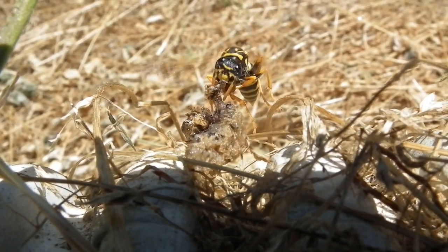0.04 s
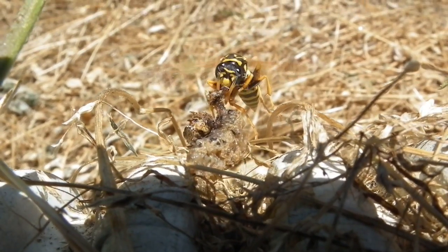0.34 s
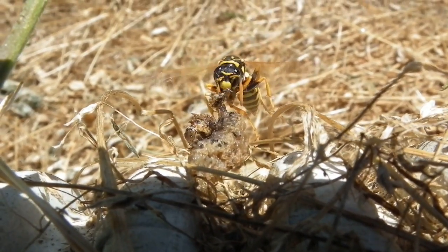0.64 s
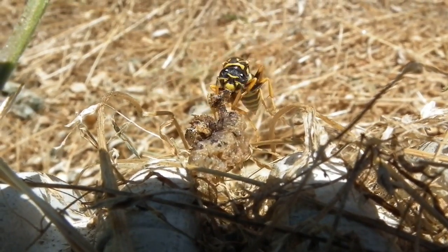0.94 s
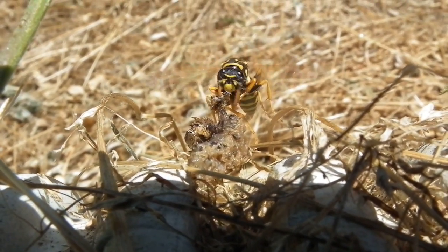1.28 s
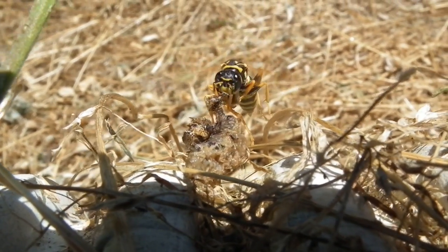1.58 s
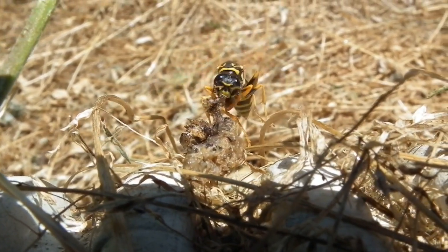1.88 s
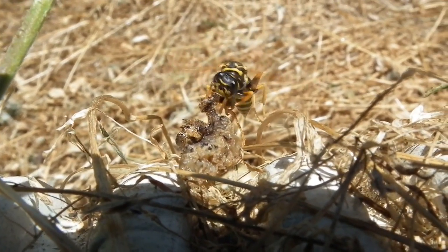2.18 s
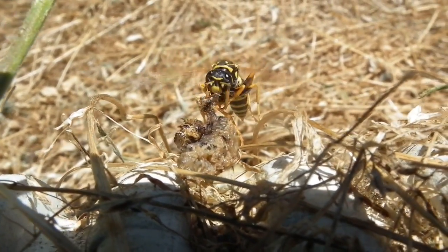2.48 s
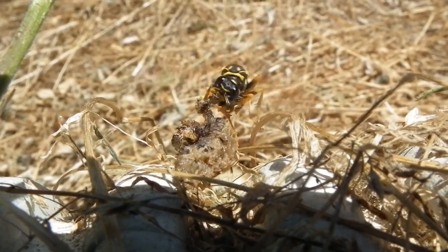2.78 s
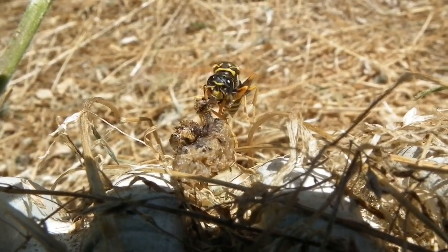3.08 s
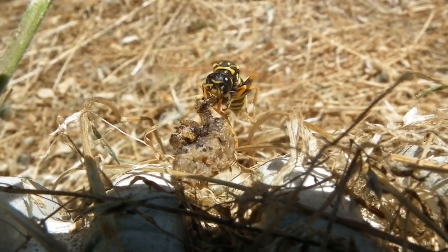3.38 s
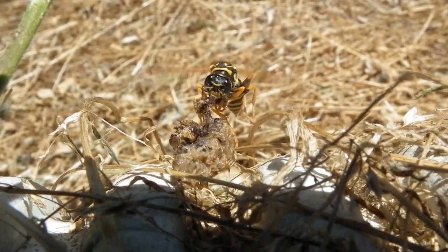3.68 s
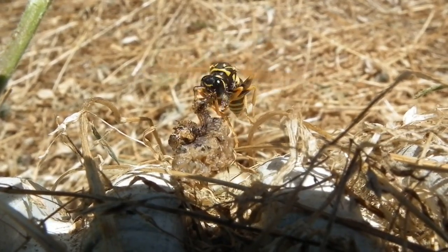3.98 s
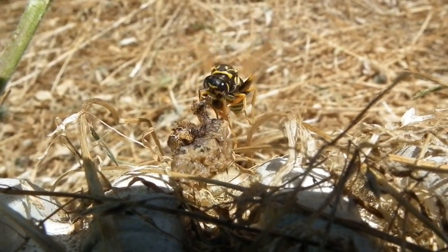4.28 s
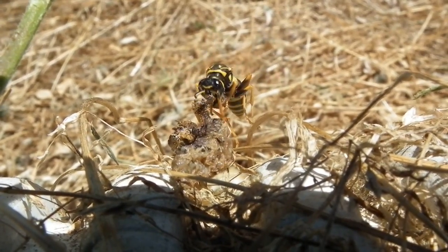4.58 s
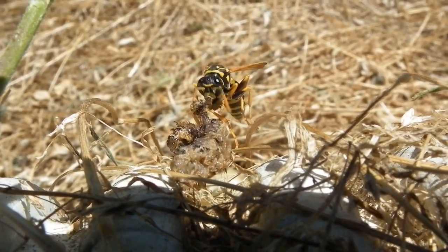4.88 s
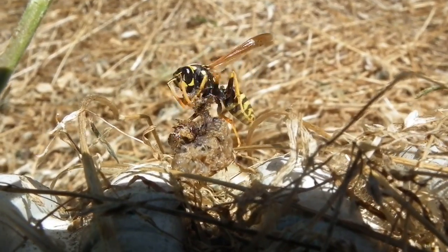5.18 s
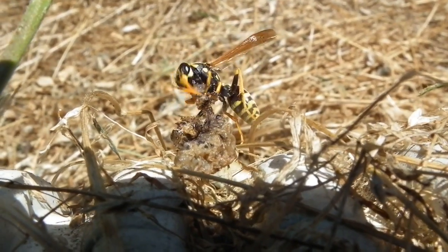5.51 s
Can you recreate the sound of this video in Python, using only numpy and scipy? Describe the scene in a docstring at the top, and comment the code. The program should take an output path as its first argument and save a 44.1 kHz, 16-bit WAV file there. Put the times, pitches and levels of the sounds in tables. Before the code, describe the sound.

A quiet outdoor bed of far rumble, soft air hiss and a faint low drone runs throughout, with a very high, barely audible insect pulsing about four times a second. Close to the microphone, dry straw ticks lightly and irregularly under a feeding wasp. It rustles softly around 1.7 and 2.5 seconds, with the clearest pair of ticks at about 2.4 seconds. A faint distant hum swells near 2.5 seconds and slowly fades. Far birds give thin, short whistles and chirps from about 0.5 to 2.2 seconds, then again from 3.4 seconds onward, coming more often after 4 seconds. At about 5.4 seconds a camera button is pressed and released: two sharp clicks in very quick succession, much louder than everything else, with a thin, brief spring ping.

```python
"""Hot day in dry grass.

A bed of far rumble, soft air hiss and a faint hum, with distant birds and a thin, high insect.
Close by, the straw rustles and ticks faintly as stalks slip under a feeding wasp.
Near the end a camera button is pressed and let go: two sharp clicks ring the body and the spring."""
import sys
import numpy as np
from scipy import signal
from scipy.io import wavfile

SR = 44100
rng = np.random.default_rng(int(sys.argv[2]) if len(sys.argv) > 2 else 0)


def unload_wav(signal):
    """Save mono or channel-first audio to the path in sys.argv[1] as 16-bit WAV at rate SR, clipped to [-1, 1]."""
    wavfile.write(
        sys.argv[1],
        SR,
        np.round(np.clip(np.atleast_2d(signal).T, -1, 1) * 32767).astype(np.int16),
    )


N = 249165
T = np.arange(N) / SR


def from_db(db):
    """Decibels to gain."""
    return 10 ** (np.asarray(db) / 20)


def rms_one(x):
    """Scale to rms 1."""
    return x / np.sqrt(np.mean(x ** 2) + 1e-20)


def unit_click(x):
    """Scale a stereo click to the energy of one millisecond at rms 1."""
    return x / np.sqrt(np.sum(x ** 2) / 2 / (SR / 1000))


def at_hz(curve, hz):
    """Read a curve on a log-frequency axis."""
    freqs, values = np.array(curve).T
    return np.interp(np.log(hz), np.log(freqs), values)


def panned(pan_db):
    """Left and right gains; positive pans left."""
    return from_db(np.array([[.5], [-.5]]) * pan_db)


def stereo(mid, side, correlation):
    """Spread two noises to left and right; lower correlation is wider."""
    return np.sqrt(1 + correlation) * mid + np.sqrt(1 - correlation) * side * [[1], [-1]]


def add(out, start_s, sound):
    """Mix a sound in at its cue."""
    i = int(start_s * SR)
    out[:, i:i + sound.shape[-1]] += sound[..., :N - i]


def drift(rate_hz):
    """Smooth random modulation at rms 1."""
    hop, warm_up = 40, 2000
    pole = np.exp(-2 * np.pi * rate_hz * hop / SR)
    white = rng.standard_normal(N // hop + warm_up + 2)
    slow = signal.lfilter([1], [1, -2 * pole, pole ** 2], white)[warm_up:]
    return np.interp(np.arange(N) / hop, np.arange(len(slow)), rms_one(slow))


def band(x, low, high):
    """Band-pass between two edges in Hz."""
    return signal.sosfilt(signal.butter(2, [low, high], "band", fs=SR, output="sos"), x)


def bands(low, high, count):
    """Rows of (lower edge, centre, upper edge), evenly spread in pitch."""
    edges = np.geomspace(low, high, count + 1)
    return zip(edges, np.sqrt(edges[:-1] * edges[1:]), edges[1:])


def blurred_tone(hz, width_hz):
    """A steady or gliding pitch blurred into a narrow band of noise."""
    phase = 2 * np.pi * np.cumsum(np.broadcast_to(hz, N)) / SR
    return rms_one(drift(width_hz) * np.cos(phase) + drift(width_hz) * np.sin(phase))


def glide(hz):
    """A sine that follows a pitch curve."""
    return np.sin(2 * np.pi * np.cumsum(hz) / SR)


def burst(low, high, t60, correlation):
    """Crowded modes of one band, struck at once and dying together; unit energy per Hz."""
    t = T[:SR // 8]
    mid, side = rng.standard_normal((2, len(t))) * from_db(-60 * t / t60)
    ring = band(stereo(mid, side, correlation), low, high)
    return ring * np.sqrt((high - low) / np.sum(ring ** 2, axis=1, keepdims=True))


# Tone of the air bed: (frequency [Hz], relative density [dB])
AIR_SPECTRUM = [(25, -20), (36, -3.5), (48, -9), (70, -0.5), (115, -0.5), (320, -4), (540, -8.5),
                (700, -8.5), (1400, -13.5), (2700, -21), (4000, -19.5), (6800, -24.5), (8500, -31),
                (15000, -35.5)]
# Its stereo image: (frequency [Hz], left-right correlation [0-1])
AIR_CORRELATION = [(60, 0.87), (140, 0.81), (350, 0.52), (700, 0.44), (1500, 0.093), (4000, 0.047),
                   (12000, 0.18)]
# Its balance: (frequency [Hz], pan [dB])
AIR_PAN = [(60, 1.5), (180, 1), (700, 0), (3000, 0.1), (12000, 1.5)]
def air(level_db=-46, flutter_db=0.6):
    """Far rumble, nearly mono, thinning into a wide, diffuse hiss."""
    out, white = 0, rng.standard_normal((2, 2, N))
    for k, (low, hz, high) in enumerate(bands(24, 16500, count=26)):
        mid, side = band(white[k % 2], low, high)
        gain = from_db(at_hz(AIR_SPECTRUM, hz) + flutter_db * drift(2.9)) * panned(at_hz(AIR_PAN, hz))
        out = out + gain * stereo(mid, side, at_hz(AIR_CORRELATION, hz))
    return from_db(level_db) * rms_one(out)


# Drone partials: (pitch [Hz], width [Hz], level [dB])
DRONE_PARTIALS = [(69, 3.9, -60.5), (159.7, 7.7, -58), (325.2, 5.4, -62.5), (425, 24, -63), (691, 45, -66)]
def drone():
    """A far, low drone of blurred tones."""
    return sum(from_db(db) * blurred_tone(hz, width) for hz, width, db in DRONE_PARTIALS)


def hum(peak_s=2.5, peak_db=-59, peak_hz=648, rise_hz_per_s=14, swell_db_per_s=26, fade_db_per_s=6.5):
    """A faint, wavering tone far away swells once and slowly fades, its pitch creeping up."""
    t = T - peak_s
    envelope = from_db(peak_db + np.minimum(swell_db_per_s * t, -fade_db_per_s * t))
    return envelope * blurred_tone(peak_hz + rise_hz_per_s * t, width_hz=9)


# The farthest birds: (start [s], end [s], pitch [Hz], half-width [Hz], level [dB])
TWITTER_BANDS = [(0, 3.8, 3820, 170, -69.5), (1.5, 2.7, 3030, 150, -72)]
def twitter(swell_db=2.5, fade_s=0.1):
    """Many far calls overlap into narrow bands that gently swell and sink."""
    out = 0
    for start, end, hz, half_width, db in TWITTER_BANDS:
        fades = np.clip((T - start) / fade_s, 0, 1) * np.clip((end - T) / fade_s, 0, 1)
        mid, side = band(rng.standard_normal((2, N)), hz - half_width, hz + half_width)
        chorus = mid + 0.45 * side * [[1], [-1]]
        out = out + from_db(db) * fades * rms_one(from_db(swell_db * drift(9.8)) * chorus)
    return out


# Whistle cues: (start [s], length [s], first pitch [Hz], target pitch [Hz], settling time [s],
# relative level [dB])
WHISTLE_CUES = [(0.453, 0.25, 4810, 3910, 0.073, -56), (0.904, 0.24, 3860, 3660, .11, -63),
                (1.732, .1, 4000, 3770, 0.11, -58), (1.88, .33, 4600, 4000, 0.16, -61),
                (3.56, .3, 4330, 3640, .12, -60), (4.193, .12, 3904, 4070, 0.12, -55),
                (4.57, .13, 4500, 4200, .11, -64)]
def whistles(waver_hz=32, attack_s=0.032, release_s=0.04, fade_db_per_s=24):
    """Nearly pure bird notes that fade as they slide toward a pitch."""
    out, waver = np.zeros((1, N)), waver_hz * drift(100)
    for start, length, first_hz, target_hz, settle_s, db in WHISTLE_CUES:
        t = T[:int(length * SR)]
        slide = target_hz + (first_hz - target_hz) * np.exp(-t / settle_s)
        note = np.sqrt(2) * glide(slide + np.interp(start + t, T, waver))
        envelope = np.minimum(t / attack_s, 1) * np.minimum((length - t) / release_s, 1)
        add(out, start, from_db(db - fade_db_per_s * t) * envelope * note)
    return out


# Chirp cues: (start [s], length [s], middle pitch [Hz], overall rise [Hz], relative level [dB])
CHIRP_CUES = [(1.374, 0.064, 4750, -500, -63.5), (1.55, 0.076, 4750, -500, -61),
              (3.43, .06, 4650, 200, -67), (4.385, 0.17, 4570, 0, -59), (4.655, 0.12, 4480, -600, -59),
              (4.91, .09, 4270, 700, -59.5), (5.124, 0.081, 4320, 600, -58.5),
              (5.323, 0.079, 4350, 498, -61)]
def chirps(arch_hz=448, rasp_depth_hz=310, rasp_rate_hz=150):
    """Bird chirps whose pitch and loudness arch together; a fast flutter makes them rasp."""
    out, rasp = np.zeros((1, N)), rasp_depth_hz * drift(rasp_rate_hz)
    for start, length, middle_hz, rise_hz, db in CHIRP_CUES:
        t = T[:int(length * SR)]
        place = 2 * t / length - 1   # -1 to 1 across the note
        arch = middle_hz + rise_hz * place / 2 - arch_hz * place ** 2
        note = glide(arch + np.interp(start + t, T, rasp))
        add(out, start, from_db(db) * np.sqrt(2 * (1 - place ** 2)) * note)
    return out


def birds(echo_t60=0.16, echo_db=-6, trim_db=-0.5):
    """Whistles and chirps, smeared by scattering on their long way."""
    song = whistles() + chirps()
    scatter = rng.standard_normal((2, SR // 2)) * from_db(-60 * T[:SR // 2] / echo_t60)
    scatter /= np.sqrt(np.sum(scatter ** 2, axis=1, keepdims=True))
    echo = signal.fftconvolve(song, scatter, axes=1)[:, :N]
    return from_db(trim_db) * (song + from_db(echo_db) * echo)


def insect(hz=12900, width_hz=170, first_s=0.099, period_s=0.2316, half_length_s=0.0077, level_db=-66.5):
    """Short, very high chirps at an even pace."""
    from_chirp_s = (T - first_s + period_s / 2) % period_s - period_s / 2
    pulses = np.exp(-.5 * (from_chirp_s / half_length_s) ** 2)
    return from_db(level_db) * pulses * np.array([blurred_tone(hz, width_hz) for _ in range(2)])


# Swells in the straw: (middle [s], half-length [s], level [dB])
STRAW_SWELLS = [(0.1, 0.39, -67), (1.658, 0.12, -56.5), (2.52, 0.15, -61.5)]
def stirring(rest_db=-68):
    """The rustle's envelope: the straw stirs in short bouts over a resting level."""
    bouts = sum(from_db(db) * np.exp(-.5 * ((T - s) / half_s) ** 2) for s, half_s, db in STRAW_SWELLS)
    return from_db(rest_db) + bouts


# Tone of dry straw, shared with the ticks: (frequency [Hz], relative density [dB])
STRAW_SPECTRUM = [(1500, -3), (3000, 3.5), (5000, -1.5), (6600, 12.5), (9500, -10.5), (15000, -12)]
def rustle(slips_per_s=900, spread_db=4.5, crossfeed=0.11):
    """Countless tiny slips between dry stalks."""
    slips = (rng.random((2, N)) < slips_per_s / SR) * rng.choice([-1, 1], (2, N))
    slips = slips * from_db(spread_db * np.minimum(rng.exponential(1, (2, N)), 4))
    slips = slips + crossfeed * slips[::-1]
    out = 0
    for k, (low, hz, high) in enumerate(bands(1500, 17000, count=7)):
        out = out + (-1) ** k * from_db(at_hz(STRAW_SPECTRUM, hz)) * band(slips, low, high)
    return stirring() * rms_one(out)


# Featured straw ticks: (time [s], relative level [dB], pan [dB])
TICK_CUES = [(0.052, -40, 1), (0.167, -40, -6), (.245, -41, -4), (.544, -37, -13), (0.549, -37, 10),
             (1.433, -40.5, -3), (1.785, -37, 2), (1.797, -39, -3), (1.868, -42, 1.5), (1.982, -39, 2),
             (2.349, -41, -5), (2.447, -29, -1), (2.46, -33.5, 0), (2.486, -39.5, -6), (2.669, -39.5, -4),
             (2.690, -40.5, -.5), (2.919, -38.5, -5), (3.329, -39.5, 7), (4.014, -39, 4), (4.956, -43, 4),
             (4.979, -42.5, 6), (5.020, -38.5, -1.5), (5.155, -40.5, -1.5)]
def ticks(t60=0.0083, stalk_hz=6500, stalk_db=7, faint_per_s=3, faint_db=-47.5, trim_db=-3):
    """Stalks snap or slip: tiny cracks with one favoured pitch, fainter ones falling at random."""
    out = np.zeros((2, N))
    chance = rng.uniform(-1, 1, (int(faint_per_s * N / SR), 3))
    faint = [(abs(when) * T[-1], faint_db + 2 * size, 3 * side) for when, size, side in chance]
    for start, db, pan_db in TICK_CUES + faint:
        crack = from_db(stalk_db) * burst(0.94 * stalk_hz, 1.27 * stalk_hz, t60, correlation=0.47)
        for low, hz, high in bands(1700, 17000, count=5):
            crack += from_db(at_hz(STRAW_SPECTRUM, hz)) * burst(low, high, t60, correlation=0.23)
        add(out, start, from_db(db + trim_db) * panned(pan_db) * unit_click(crack))
    return out


# Camera body modes: (pitch [Hz], t60 [s], relative press level [dB], relative release level [dB])
BODY_MODES = [(295, 0.19, -37.5, -45), (685, 0.022, -27, -39), (860, 0.014, -16.5, -25.5),
              (1120, 0.0059, -15, -12.5), (1790, 0.0094, -17, -25), (1900, 0.021, -23, -15),
              (2150, 0.007, -10, -18), (2550, 0.0053, -15.5, -34), (3610, 0.012, -18, -13),
              (4100, 0.0064, -15, -5), (4900, 0.011, -13, -8.5), (5350, 0.0085, -14.5, -14),
              (5890, 0.0057, -25, -8), (10170, 0.0043, -22, -29), (14000, 0.0034, -33, -24)]
def body_ring(stroke, lead_rad=0.59, jitter_rad=0.097, attack_s=0.00005):
    """Modes start at once, neighbours in opposite polarity; each reaches one microphone a little early."""
    t, out = T[:SR // 8], 0
    for k, (hz, t60, *levels_db) in enumerate(BODY_MODES):
        lead = (-1) ** (k // 2) * lead_rad * np.array([[1], [-1]])
        phase = k * np.pi + lead + jitter_rad * rng.standard_normal((2, 1))
        out = out + from_db(levels_db[stroke] - 60 * t / t60) * np.sin(2 * np.pi * hz * t + phase)
    return out * (1 - np.exp(-t / attack_s))


# Decay of the casing: (frequency [Hz], t60 [s])
CASING_DECAY = [(300, .07), (800, 0.042), (2000, 0.0074), (5000, 0.013), (12000, 0.014)]
def casing_rattle(colour, tail_db=-13, tail_t60=0.044):
    """The casing's crowded modes give a noisy snap with a soft tail."""
    out = 0
    for low, hz, high in bands(100, 17000, count=18):
        snap = burst(low, high, at_hz(CASING_DECAY, hz), correlation=0.19)
        tail = from_db(tail_db) * burst(low, high, tail_t60, correlation=0.2)
        out = out + from_db(at_hz(colour, hz)) * (snap + tail)
    return unit_click(out)


# Spring modes: (pitch [Hz], level on release [dB], t60 [s])
SPRING_MODES = [(1924, -40, 0.055), (3960, -50, 0.44), (5240, -40, .07), (6970, -43, 0.063),
                (14800, -43, .04)]
def spring_ring():
    """The button's spring rings on as a thin ping."""
    return sum(from_db(db - 60 * T / t60) * np.sin(2 * np.pi * hz * T) for hz, db, t60 in SPRING_MODES)


# Rattle colours, button going down and coming up: (frequency [Hz], relative density [dB])
PRESS = [(100, -32), (300, -14), (430, -8), (780, 4.5), (1250, -17), (2100, 5), (3100, -5), (4900, 0),
         (6400, -17), (7600, 2.5), (10000, -24), (15000, -28)]
RELEASE = [(100, -27), (300, -28), (650, -7.5), (1100, -7), (2000, -0.5), (2800, -22), (4000, 2.5),
           (6000, -15), (7600, -7), (10000, -34), (15000, -16)]
# Press, then release: (time [s], gain [dB], rattle colour [table], pan [dB])
BUTTON_CUES = [(5.4034, 4, PRESS, -3), (5.431, 0, RELEASE, 1.5)]
def button(rattle_db=-13, spring_db=(-9, 0)):
    """Each snap rings the body and rattles the casing; the spring pings louder on release."""
    out = np.zeros((2, N))
    for stroke, (start, db, colour, pan_db) in enumerate(BUTTON_CUES):
        click = from_db(rattle_db) * casing_rattle(colour) + body_ring(stroke)
        add(out, start, from_db(db) * panned(pan_db) * click)
        add(out, start, from_db(spring_db[stroke]) * spring_ring())
    return out


def from_the_left(x, lag_s=0.00003):
    """Sound from the left reaches the right microphone a moment later."""
    allpass = (1 - lag_s * SR) / (1 + lag_s * SR)
    return np.array([x[0], signal.lfilter([allpass, 1], [1, allpass], x[1])])


def scene():
    """The stereo mix: far bed, close straw, wildlife and the button on top."""
    bed = from_the_left(air() + drone() + hum())
    return bed + rustle() + ticks() + birds() + twitter() + insect() + button()


# Narrow dips in the camera's response: (centre [Hz], width [Hz])
TREBLE_NOTCHES = [(7930, 920), (8830, 890), (11720, 610)]
def record(dry, notch_floor_db=-29, cutoff_hz=15500):
    """The camera notches the treble, clips at full scale and cuts the top."""
    notched = dry
    for hz, width_hz in TREBLE_NOTCHES:
        notch = signal.butter(2, [hz - width_hz / 2, hz + width_hz / 2], "bandstop", fs=SR, output="sos")
        notched = signal.sosfilt(notch, notched)
    leak = from_db(notch_floor_db) * (dry - notched)
    clipped = np.clip(notched + leak, -1, 1)
    return signal.sosfilt(signal.butter(28, cutoff_hz, fs=SR, output="sos"), clipped)


dry = scene()
out = record(dry)
unload_wav(out)
```